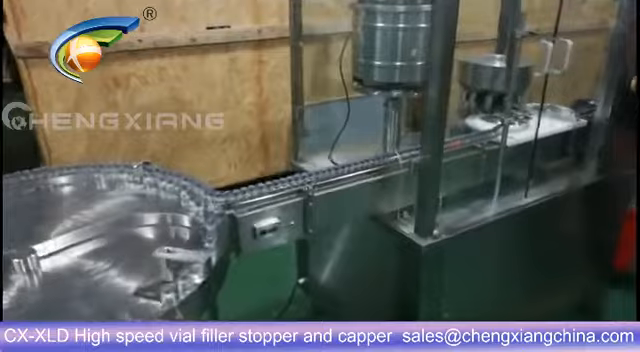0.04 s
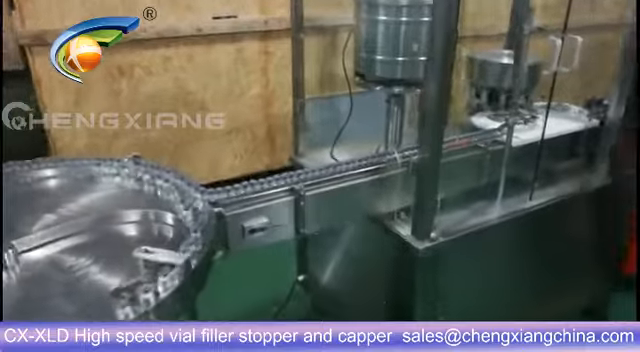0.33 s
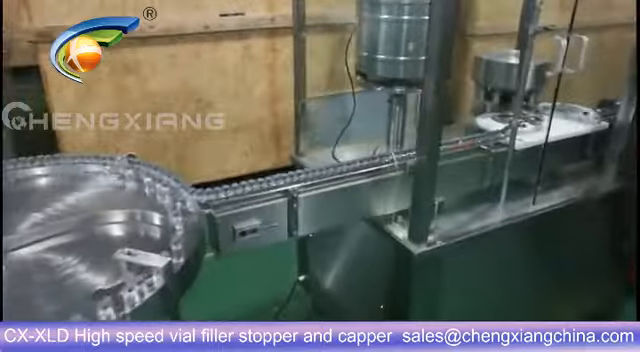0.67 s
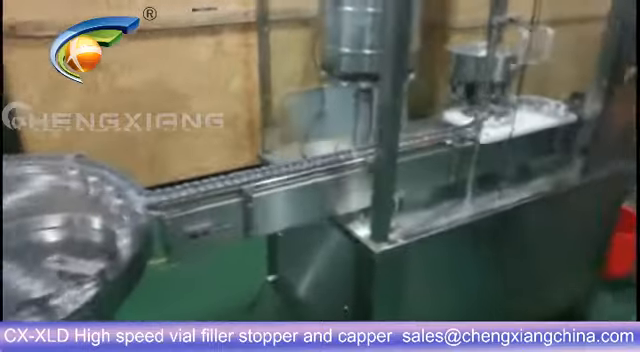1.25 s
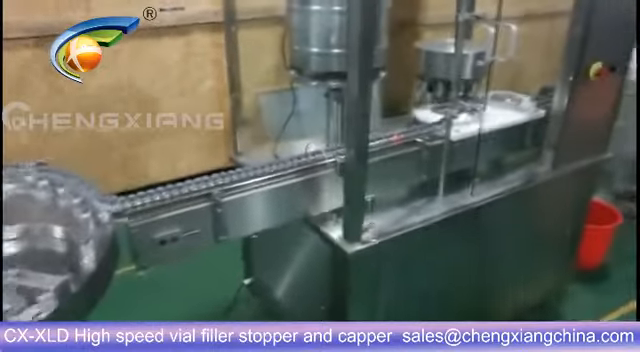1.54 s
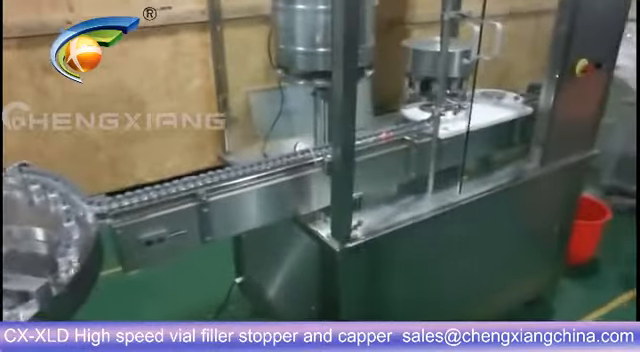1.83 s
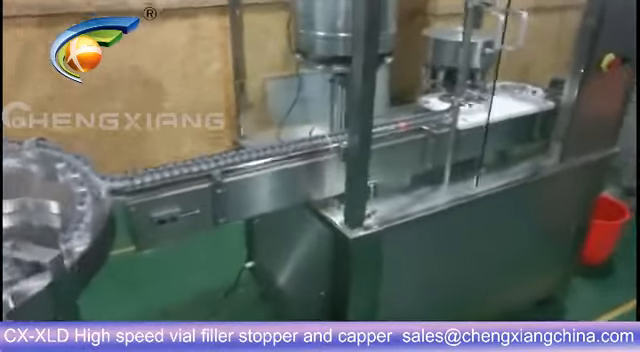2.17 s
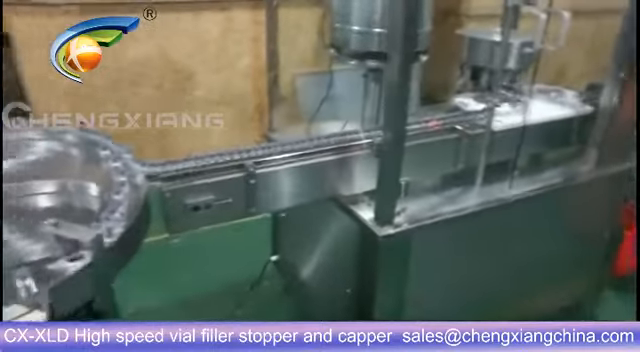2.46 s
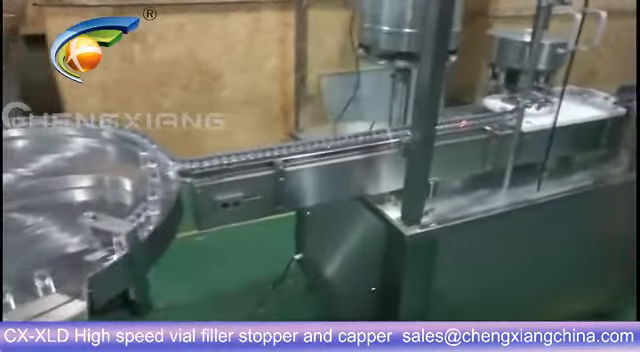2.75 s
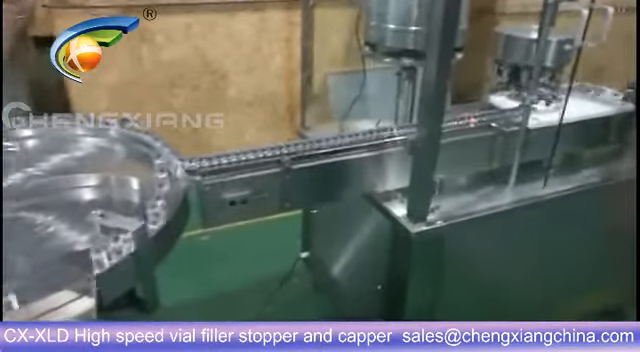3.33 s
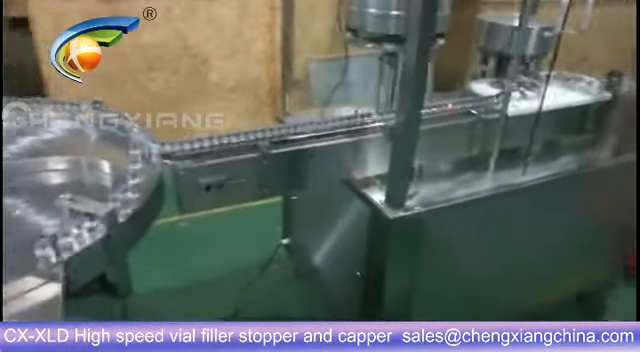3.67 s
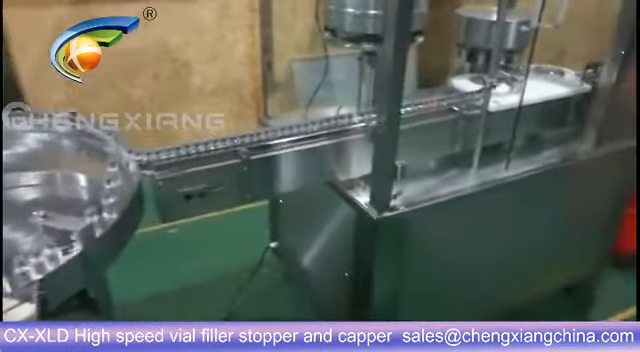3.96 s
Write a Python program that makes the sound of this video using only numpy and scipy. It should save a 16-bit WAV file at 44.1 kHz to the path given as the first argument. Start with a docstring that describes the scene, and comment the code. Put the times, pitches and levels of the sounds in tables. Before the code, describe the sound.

A vial filling machine runs steadily in a workshop, heard from a couple of metres away. Glass vials and caps chatter, jingle and clink in surges over a low rumble and hum, with a bright rattle twice a second.

```python
"""Vial filling line

A workshop machine a couple of metres away, over a low rumble and a drive that drones under load.
Vibrating bowl feeders hum at mains pitch and keep caps and glass vials chattering; the chatter
surges as the queue is shoved on. Vials jingle, bump the rails and clink. On top, the filling head
strokes twice a second with a bright rattle."""
import sys
import numpy as np
from scipy import signal
from scipy.fft import rfft, irfft
from scipy.io import wavfile
from scipy.ndimage import uniform_filter1d

SR = 44100
rng = np.random.default_rng(int(sys.argv[2]) if len(sys.argv) > 2 else 0)


def bounce(signal):
    """Save signal as a 16-bit WAV file at the path given by the first command-line argument."""
    frames = np.transpose(np.atleast_2d(signal))
    limited = np.clip(frames, -1, 1)
    pcm = np.round(limited * 32767).astype(np.int16)
    wavfile.write(sys.argv[1], SR, pcm)


N = 176400

# rumble of frame and motors: f/Hz, relative level/dB
RUMBLE_EQ = [(20, -12.5), (35, 1.5), (55, 2), (90, 1), (130, 2.5), (190, 5), (290, 2.5), (400, -3.5),
             (600, -4.5), (800, -9.5), (1200, -21.5)]
# hum of the feeder magnets: multiple of the mains, level/dB
HUM_PARTIALS = [(1, -50.5), (2, -38.5), (3, -47), (4, -46.5), (5, -55.5), (7, -57), (8, -54), (9, -55.5),
                (11, -52), (13, -58), (16, -60), (20, -52.5), (22, -56.5), (28, -52)]
# swells of the drive under load: t/s, length/s, level/dB
DRIVE_SWELLS = [(.39, .19, -38.5), (1.69, .4, -38), (2.19, 0.32, -37), (2.63, .27, -34.5), (3.06, .36, -38),
                (3.45, .36, -35.5)]
# knocks of a cabinet panel: t/s, f/Hz, level/dB
PANEL_KNOCKS = [(2.014, 251, -26.5), (2.67, 260, -22)]
# vials jingling on the turntable: f/Hz, relative level/dB
JINGLE_EQ = [(1500, -7), (2000, -0.5), (2700, -1.5), (3500, -2), (4500, -6), (6000, -8), (7500, -13)]
# steady chatter of caps and vials: f/Hz, relative level/dB
CHATTER_EQ = [(250, -43.5), (500, -22), (680, -11), (790, -3.5), (1100, 2), (1350, -1.5), (1580, 3.5),
              (2050, 4.5), (2900, -1.5), (3150, -7), (3450, -5), (4200, -10.8), (5250, -12.5), (5750, -6),
              (6500, -13.5), (7100, -16.5), (7600, -15.5)]
# resonances of the steel bowl: f/Hz, width/Hz, level/dB
BOWL_MODES = [(1706, 27, -47.5), (1775, 10, -42.5), (1799, 11, -38), (1843, 18, -46), (1956, 15, -42),
              (2110, 12, -48), (2556, 18, -48), (3643, 10, -49)]
# shoves of the queue: t/s, length/s, jostle level/dB, scrape level/dB
QUEUE_SURGES = [(0.058, 0.05, -30.5, -36), (0.280, 0.26, -27.5, -32), (0.413, 0.077, -40, -48),
                (0.584, 0.1, -34, -33), (0.73, 0.22, -42, -40), (0.976, 0.18, -29.5, -38.5),
                (1.584, 0.23, -30.5, -42.5), (1.947, 0.28, -38, -44), (2.269, 0.23, -27.5, -37.5),
                (2.537, 0.099, -29, -39), (2.697, 0.11, -35.5, -51), (3.024, 0.048, -29, -61),
                (3.538, 0.041, -29.5, -47)]
# vials jostling in the queue: f/Hz, relative level/dB
JOSTLE_EQ = [(700, -37), (1400, -8.5), (1800, 1.5), (2550, -0.5), (3200, -6.5), (4500, -8), (7500, -19)]
# dull scrape of glass on a rail: f/Hz, relative level/dB
SCRAPE_EQ = [(300, -25), (550, 1.5), (850, 3.5), (1150, 4.5), (1650, 2.5), (2200, -15.5), (4000, -32.5)]
# resonances of the scraped rails: f/Hz, width/Hz, level against the scrape/dB
RAIL_MODES = [(823, 36, -8), (1137, 140, -10), (1550, 73, -13.5), (1727, 45, -9)]
# stereo lean of chatter and surges: f/Hz, left minus right/dB
RATTLE_PAN = [(400, 10), (1000, 0), (1800, 3), (2600, 3), (3100, -2), (3600, 6.5), (4400, -1.5), (5500, -3),
              (7300, 2)]
# squeaks of glass against a rail: t/s, length/s, level/dB
RAIL_SQUEAKS = [(1.007, 0.22, -44.5), (1.588, 0.097, -45)]
# resonances of a squeak: f/Hz, width/Hz, relative level/dB
SQUEAK_MODES = [(7310, 82, 1), (7280, 60, -10.5)]
# vials bumping the rail: t/s, f/Hz, level/dB
RAIL_BUMPS = [(0.293, 845, -31), (0.333, 1786, -25), (0.444, 1770, -24), (0.476, 1148, -30),
              (0.520, 1550, -31), (0.718, 1092, -28.5), (0.874, 1340, -30), (1.088, 1145, -32),
              (2.377, 1025, -35), (2.446, 1144, -32)]
# glass striking a steel guide: t/s, level/dB
GUIDE_STRIKES = [(1.585, -28.5), (1.616, -26.5), (1.706, -25.5), (1.751, -33)]
# resonances of that guide: f/Hz, t60/s, relative level/dB
GUIDE_MODES = [(2320, 0.1, -12), (2440, 0.26, -1), (2700, .1, -1), (2810, 0.41, -4.5), (2960, 0.17, -9),
               (3400, .12, -11)]
# single vials clinking: t/s, f/Hz, level/dB, left minus right/dB, tick against the ring/dB
VIAL_CLINKS = [(0.127, 6770, -25.5, 4, 4), (1.083, 4970, -26, -4, 0), (1.588, 4335, -31, 0, -8),
               (1.600, 4076, -27, 0, -6), (2.099, 6459, -35, 2, -3.5), (2.103, 6833, -34, 2, -3),
               (2.412, 3847, -29, -4, -5), (2.612, 6058, -29, 3, -7), (3.577, 6201, -36, 0, -6),
               (3.588, 6775, -35, -1, -6)]
# strokes of the filling head: t/s, length/s, level/dB
HEAD_STROKES = [(0.607, 0.054, -33), (1.107, 0.05, -30.5), (1.571, 0.059, -28.5), (2.078, 0.053, -29),
                (2.575, 0.047, -32), (3.062, 0.032, -29), (3.553, 0.056, -30)]
# bright glass contact, in strokes and clinks: f/Hz, relative level/dB
GLASS_EQ = [(1000, -23), (2000, -3), (2700, 1.5), (4000, 5.5), (5200, 0.5), (6200, 6), (7600, -1.5)]

MAINS_HZ, FEEDER_THROB_DEPTH = 50, 0.2
DRIVE_HZ, DRIVE_RISE_HZ_PER_S = 186.3, 37
CONTACT_T60_S, ROOM_T60_S, ROOM_DB = 0.012, 0.26, 1
RIGHT_LAG_S, MONO_BELOW_HZ, TURN_DB_PER_S = 0.000593, 430, 0.37

TIME = np.arange(N) / SR
BIN_HZ = np.arange(N // 2 + 1) * SR / N


def undb(db):
    """Decibels to gain."""
    return 10 ** (np.asarray(db) / 20)


def unit(x):
    """Scale to an rms of 1."""
    return x / np.sqrt(np.mean(x ** 2))


def curve_db(points):
    """Join (f/Hz, level/dB) points on a log-frequency axis."""
    hz, db = np.array(points).T
    return np.interp(np.log(BIN_HZ + 1), np.log(hz), db)


def colour(x, eq):
    """Shape a sound with an EQ curve and bring it to rms 1."""
    return unit(irfft(rfft(x) * undb(curve_db(eq)), N))


def pan(db):
    """Left and right gains; positive dB leans left."""
    return undb(np.array([[1], [-1]]) * db / 2)


def wander(rate):
    """Smooth random modulation at rms 1, taking `rate` steps a second."""
    hold = int(SR / rate)
    steps = np.repeat(rng.standard_normal(N // hold + 4), hold)
    return unit(uniform_filter1d(uniform_filter1d(steps, hold), hold)[hold:hold + N])


def swell(start, length, attack_s=0.018, release_s=0.029):
    """Envelope with a linear attack and an exponential release that starts after `length`."""
    t = TIME - start
    return np.clip(t / attack_s, 0, 1) * np.exp(-np.maximum(t - length, 0) / release_s)


def fade(t, t60):
    """A decay that starts at t = 0 and falls 60 dB in t60 seconds."""
    return (t >= 0) * np.exp(-np.log(1000) * np.maximum(t, 0) / t60)


def room(x, lag):
    """Direct sound, `lag` seconds late on the right, plus a short, wide workshop tail."""
    tail = rng.standard_normal((2, N)) * fade(TIME, ROOM_T60_S)
    tail /= np.sqrt(np.sum(tail ** 2, axis=1, keepdims=True))
    direct = np.exp(-2j * np.pi * BIN_HZ * np.array([[0], [lag]]))
    return irfft(rfft(x) * (direct + undb(ROOM_DB) * rfft(tail)), N)


def tone(hz, db, waver_db):
    """A wavering sine; the higher it is, the wider the room spreads it."""
    width = min((hz / MONO_BELOW_HZ) ** 2 / 2, 1)
    phase = 2 * np.pi * (hz * TIME + rng.random())
    sides = np.array([undb(waver_db * width * wander(2.7)) * np.sin(phase + width * wander(1.594))
                      for _ in range(2)])
    return undb(db) * unit(sides * undb(waver_db * wander(5.21)))


def struck_mode(t, hz, t60):
    """One struck resonance, with its own phase on each side."""
    return np.sin(2 * np.pi * (hz * t + rng.random((2, 1)) / 2)) * fade(t, t60)


def ringing(modes):
    """Resonances kept sounding by countless small taps, played as noise."""
    push = rfft(room(rng.standard_normal(N), RIGHT_LAG_S) + room(rng.standard_normal(N), 0))
    return sum(undb(db) * unit(irfft(push / (1 + 2j * (BIN_HZ - hz) / width), N))
               for hz, width, db in modes)


def pings(rate, low_hz, high_hz, t60, spread_db):
    """Random touches, `rate` a second, each ringing briefly with its own pitch, level and pan."""
    count = int(rate * N / SR)
    t = np.arange(SR // 4) / SR
    decay, out = fade(t, t60), np.zeros((2, N))
    for when, pitch, size, side, left_phase, right_phase in rng.random((count, 6)):
        hz = low_hz + pitch * (high_hz - low_hz)
        ring = np.sin(2 * np.pi * (hz * t + np.array([[left_phase], [right_phase]]))) * decay
        span = (int(when * N) + np.arange(len(t))) % N
        out[:, span] += undb(spread_db * 2 * size) * np.sqrt([[side], [1 - side]]) * ring
    return unit(out)


def contacts(rate, spread_db, places=8):
    """Tiny collisions, `rate` a second, left and ahead, thrown in step with the feeder."""
    out = 0
    for place in range(places):
        throw = 1 + FEEDER_THROB_DEPTH * np.cos(2 * np.pi * (MAINS_HZ * TIME + rng.random()))
        hits = rng.random(N) < rate * throw / places / SR
        strength = undb(spread_db * np.clip(rng.standard_normal(N), -2, 2))
        ring = rng.standard_normal(N) * fade(TIME, CONTACT_T60_S)
        impulses = hits * strength * rng.choice([-1, 1], N)
        ticks = irfft(rfft(impulses) * rfft(ring), N)
        out = out + room(ticks, RIGHT_LAG_S * (place % 2))
    return unit(out)


def rumble():
    """A low noise bed from frame and motors, narrowing to mono in the bass."""
    mid, side = rng.standard_normal((2, N))
    side = irfft(rfft(side) * np.minimum((BIN_HZ / MONO_BELOW_HZ) ** 3, 1), N)
    return undb(-35) * colour(np.array([mid + side, mid - side]), RUMBLE_EQ)


def feeder_hum():
    """The feeders' magnets buzz on multiples of the mains, beside one low motor tone."""
    magnets = sum(tone(k * MAINS_HZ, db, waver_db=0.84) for k, db in HUM_PARTIALS)
    return magnets + tone(hz=62, db=-50.5, waver_db=3)


def drive_drone():
    """The drive idles softly and swells under load, a rough drone creeping up in pitch each time."""
    out = tone(DRIVE_HZ, db=-48, waver_db=4)
    jitter_rad = 0.35 * wander(28)
    for start, length, db in DRIVE_SWELLS:
        t = TIME - start - length / 2  # zero at the crest
        arch = np.sqrt(2) * np.maximum(1 - (2 * t / length) ** 2, 0)
        cycles = DRIVE_HZ * t + DRIVE_RISE_HZ_PER_S * t ** 2 / 2 + rng.random()
        out = out + undb(db) * arch * np.sin(2 * np.pi * cycles + jitter_rad)
    roughness_db = 1.8 * wander(28)
    return out * undb(roughness_db)


def panel_knocks():
    """A cabinet panel knocks: one hollow mode with a soft attack."""
    out = 0
    for start, hz, db in PANEL_KNOCKS:
        t = TIME - start
        envelope = np.clip(t / 0.0079, 0, 1) * fade(t, t60=0.1)
        out = out + undb(db) * envelope * np.sin(2 * np.pi * hz * t)
    return out


def turntable_jingle():
    """Vials touch on the turntable in a steady glassy shimmer."""
    glass = pings(rate=520, low_hz=1507.4, high_hz=7490, t60=0.15, spread_db=3)
    return undb(-33.5) * colour(glass, JINGLE_EQ)


def bowl_chatter():
    """Caps and vials rattle without pause, a few tapping harder, and the steel bowl rings."""
    rattle = undb(-28.5) * colour(contacts(rate=2600, spread_db=3), CHATTER_EQ)
    taps = undb(-37.3) * pings(rate=65, low_hz=1622, high_hz=2518, t60=0.065, spread_db=2)
    bowl = ringing(BOWL_MODES)
    ride_db = 0.3 * wander(33) - 0.26 * TIME  # slight flutter on a slow fade
    return (rattle + taps + bowl) * undb(ride_db)


def queue_surges():
    """The queue is shoved on: vials jostle, ring and scrape along the rails, which ring too."""
    jostle_level = sum(undb(db) * swell(start, length, attack_s=0.033, release_s=0.071)
                       for start, length, db, _ in QUEUE_SURGES)
    scrape_level = sum(undb(db) * swell(start, length, attack_s=0.16, release_s=0.071)
                       for start, length, _, db in QUEUE_SURGES)
    scrape = colour(contacts(rate=900, spread_db=-0.5, places=4), SCRAPE_EQ) + ringing(RAIL_MODES)
    glass = pings(rate=380, low_hz=1558, high_hz=3696, t60=0.07, spread_db=5.5)
    clatter = colour(contacts(rate=1800, spread_db=6), JOSTLE_EQ)
    jostle = unit(clatter + undb(-2) * colour(glass, JOSTLE_EQ))
    return jostle_level * jostle + scrape_level * scrape


def rail_squeaks():
    """Glass rubs on steel with a thin, high ring."""
    level = sum(undb(db) * swell(start, length) for start, length, db in RAIL_SQUEAKS)
    return level * ringing(SQUEAK_MODES)


def rail_bumps():
    """Vials bump the rail: a dull crack and a short ring each."""
    out, crack = 0, undb(-3) * colour(rng.standard_normal((2, N)), SCRAPE_EQ)
    for start, hz, db in RAIL_BUMPS:
        t = TIME - start
        out = out + undb(db) * (crack * fade(t, t60=0.03) + struck_mode(t, hz, t60=0.18))
    return out


def guide_strikes():
    """After the hardest stroke, glass hits a steel guide several times and sets it ringing."""
    return sum(undb(db + mode_db) * struck_mode(TIME - start, hz, t60)
               for start, db in GUIDE_STRIKES for hz, t60, mode_db in GUIDE_MODES)


def vial_clinks():
    """Single vials clink: a bright tick and one short glass ring."""
    out, noise = 0, colour(rng.standard_normal((2, N)), GLASS_EQ)
    for start, hz, db, pan_db, tick_db in VIAL_CLINKS:
        t = TIME - start
        tick = undb(tick_db) * noise * fade(t, t60=0.05)
        out = out + undb(db) * pan(pan_db) * (tick + struck_mode(t, hz, t60=0.08))
    return out


def head_strokes():
    """Each stroke of the filling head gives a short, bright rattle of glass."""
    level = sum(undb(db) * swell(start, length) for start, length, db in HEAD_STROKES)
    return level * colour(contacts(rate=2100, spread_db=5.5, places=4), GLASS_EQ)


def scene():
    """The mix: chatter and surges sit to the left, a little more so as the listener turns."""
    rattle = irfft(rfft(bowl_chatter() + queue_surges()) * pan(curve_db(RATTLE_PAN)), N)
    rattle *= pan(TURN_DB_PER_S * (TIME - 2))
    jingle = turntable_jingle()
    accents = head_strokes() + guide_strikes() + rail_bumps() + rail_squeaks() + vial_clinks()
    machinery = feeder_hum() + drive_drone() + panel_knocks() + rumble()
    return machinery + jingle + rattle + accents


def record(dry):
    """A steep low-pass takes the air off the top."""
    return signal.sosfilt(signal.ellip(14, 0.1, 85, 7490, fs=SR, output="sos"), dry)


dry = scene()
out = record(dry)
bounce(out)
```